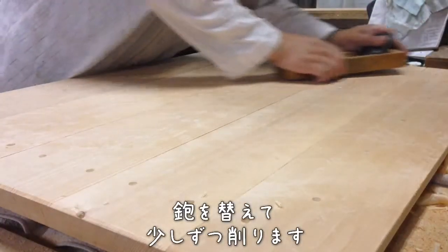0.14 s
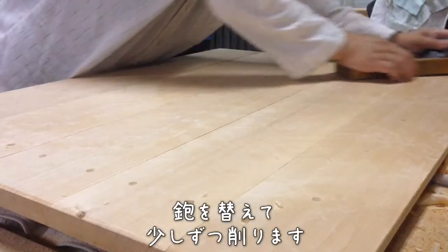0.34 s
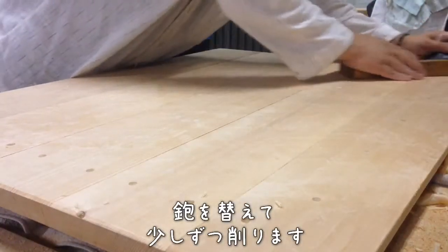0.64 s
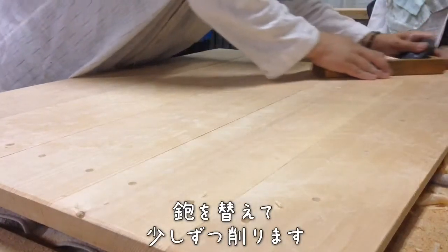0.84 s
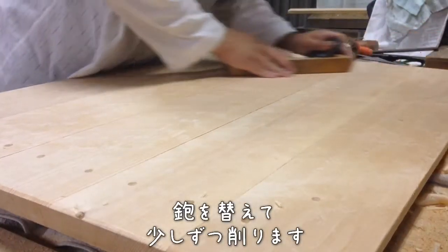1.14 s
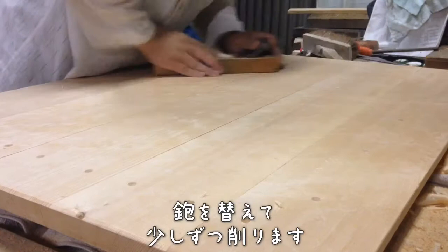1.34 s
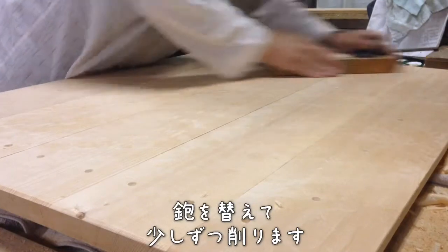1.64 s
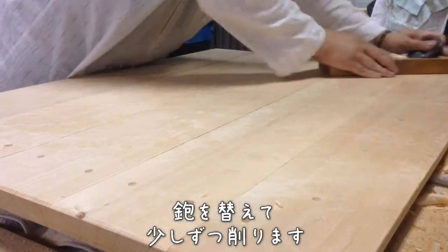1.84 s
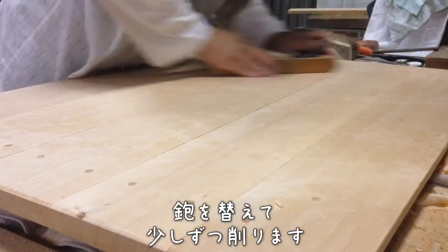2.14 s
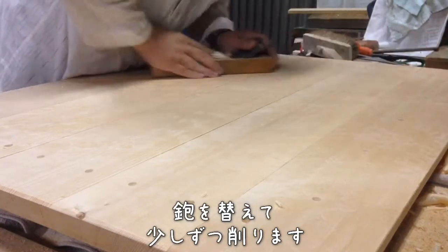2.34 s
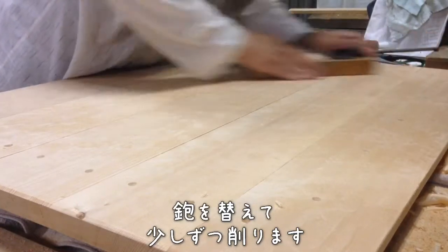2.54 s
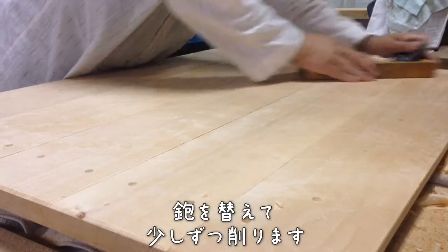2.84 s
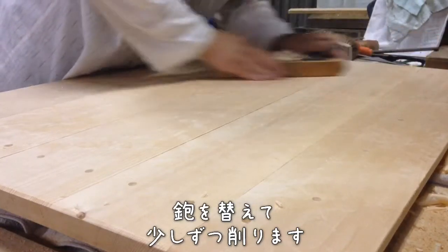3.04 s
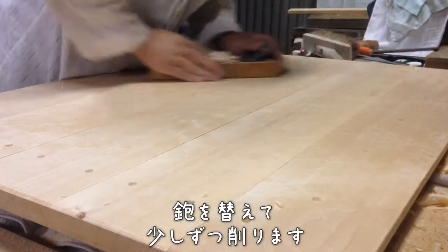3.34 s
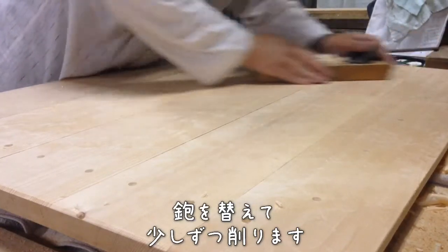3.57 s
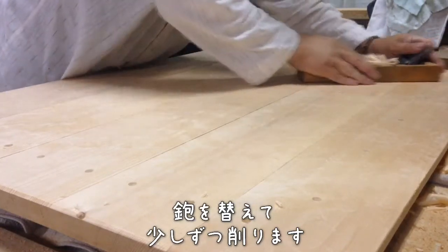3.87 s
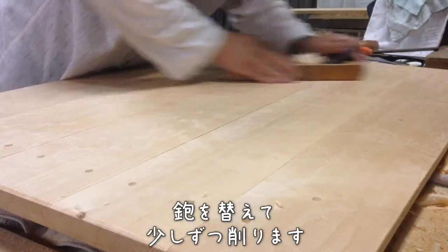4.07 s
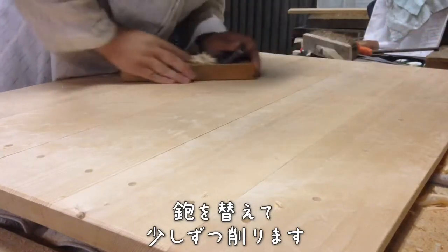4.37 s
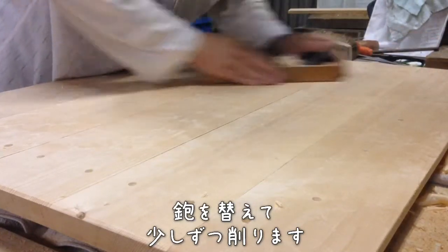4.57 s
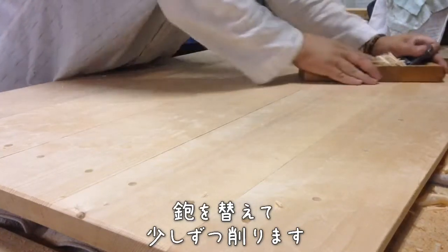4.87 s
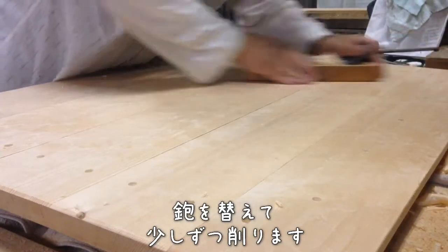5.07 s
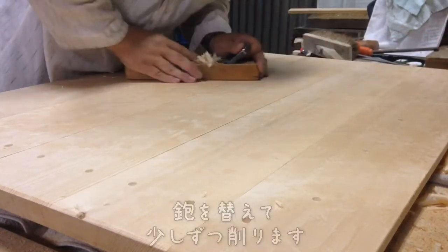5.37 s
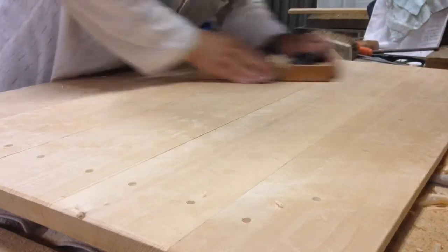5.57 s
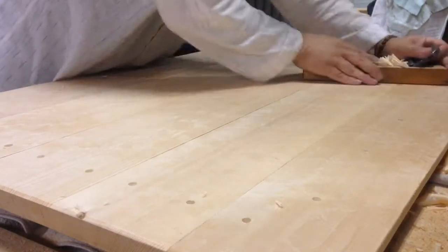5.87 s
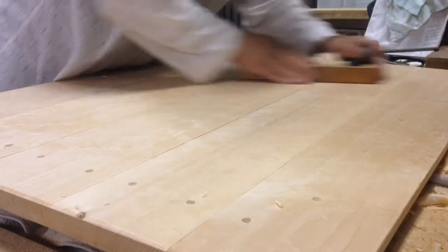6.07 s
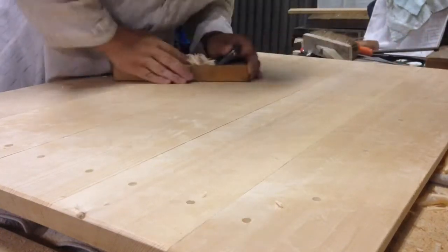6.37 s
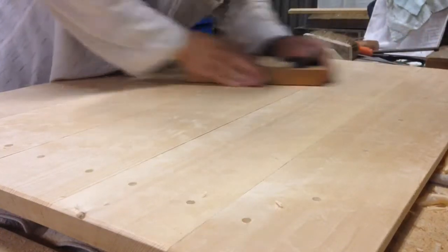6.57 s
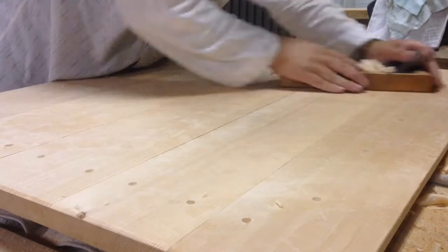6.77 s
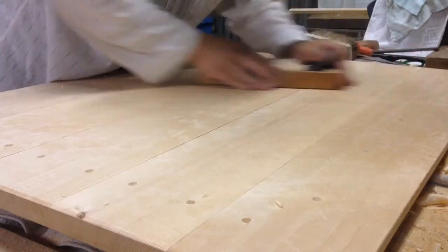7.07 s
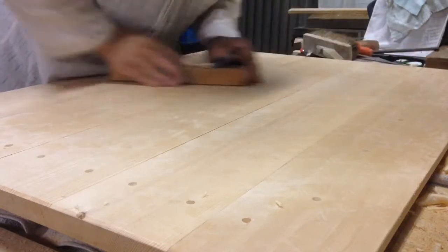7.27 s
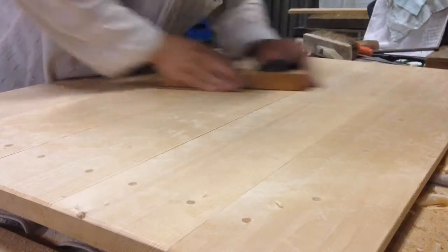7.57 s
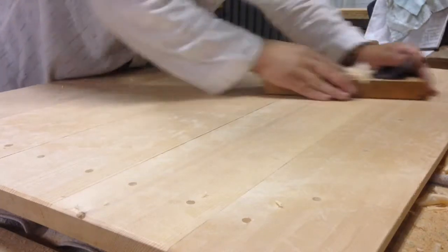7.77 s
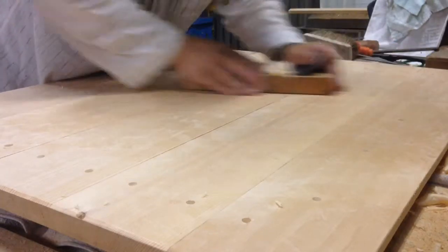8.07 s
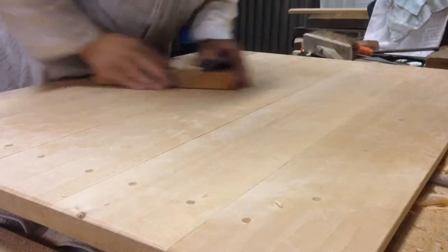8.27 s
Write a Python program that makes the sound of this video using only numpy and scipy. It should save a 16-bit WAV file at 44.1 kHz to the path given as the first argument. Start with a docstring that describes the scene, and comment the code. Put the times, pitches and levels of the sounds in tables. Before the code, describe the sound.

A wooden hand plane knocks onto a large tabletop, then rasps across it in eight steady hissing strokes with duller bumping returns.

```python
"""A wooden hand plane is set down on a large tabletop and pulled across it eight times in a small workshop.
On each pull random fractures of the fibres excite block and blade, and the shaving hisses.
On the way back the block bumps on the boards as struck modes; the unloaded blade scrapes and rings.
Snags splinter, stick-slip chatter groans and squeaks, and the tabletop drums under it all.
The direct sound is close and mono, with a short, fainter answer from the room over quiet air."""
import sys
import numpy as np
from scipy import signal
from scipy.fft import rfft, irfft, next_fast_len
from scipy.io import wavfile
from scipy.ndimage import uniform_filter1d, map_coordinates

SR = 44100
rng = np.random.default_rng(int(sys.argv[2]) if len(sys.argv) > 2 else 0)


def waveform_to_disk(signal):
    """Save audio, clipped to [-1, 1], as 16-bit WAV at the path in sys.argv[1]."""
    frames = np.transpose(np.atleast_2d(signal))
    scaled = np.clip(frames, -1, 1) * 32767
    samples = np.round(scaled).astype(np.int16)
    wavfile.write(sys.argv[1], SR, samples)


N = 371322

# All level columns are relative; the functions add the common offsets of each layer.
# modes of the tabletop: mode_hz [Hz], level_db [dB], t60_s [s]
TABLETOP_MODES = [(63.6, -39.5, 0.99), (109, -23, 0.25), (176.5, -5.5, 0.15), (207.2, -5.5, 0.21),
                  (233.3, 0, 0.19), (247, -5.5, 0.089), (316.5, 2, 0.093), (379, -6.5, 0.13),
                  (458, -7, 0.14), (500.6, 4, 0.098), (579, 0.5, 0.11), (679.5, -10, 0.17),
                  (728, -7, 0.077), (844, -3.5, 0.16), (1003, 5, 0.058), (1370, 6.5, 0.023),
                  (1856, 6.5, 0.064), (2016, -3, 0.085)]
# resonances of the steel blade: centre_hz [Hz], width_hz [Hz], level_db [dB]
BLADE_RESONANCES = [(1700, 39, 4.5), (3123, 41, -2), (3565, 59, 5), (4780, 71, 0.5), (5590, 120, -7),
                    (6450, 55, -12), (7800, 58, -13), (7980, 82, -4)]
# spectrum of the hissing shaving: freq_hz [Hz], level_db [dB per Hz]
SHAVING_SPECTRUM = [(800, -62), (2000, -14), (3500, 1.5), (5400, 0.5), (6800, -3), (8300, -6),
                    (10500, -8.5), (15000, -15)]


def amp(db):
    """Decibels to gain."""
    return 10 ** (np.asarray(db) / 20)


def unit(x):
    """Scale to rms 1."""
    return x / np.sqrt(np.mean(x ** 2) + 1e-20)


def along(points, hz):
    """(Hz, value) points read on a log frequency axis."""
    point_hz, values = np.transpose(points)
    return np.interp(np.log(hz + 1), np.log(point_hz), values)


def add(track, start_s, x):
    """Mix x into track at a time, cut off at the end of the track."""
    room = track[max(round(start_s * SR), 0):][:len(x)]
    room += x[:len(room)]


def wobble(rate):
    """A smooth random curve through rate knots a second."""
    knots = rng.standard_normal(int(N * rate / SR) + 4)
    return map_coordinates(knots, [np.arange(N) * rate / SR])


def filtered(x, response):
    """x times a response given as a function of frequency."""
    size = next_fast_len(N + SR // 2)
    hz = np.fft.rfftfreq(size, 1 / SR)
    return irfft(rfft(x, size) * response(hz), size)[:N]


def coloured(x, spectrum):
    """x shaped by a (Hz, dB) spectrum, at rms 1."""
    return unit(filtered(x, lambda hz: amp(along(spectrum, hz))))


def resonate(x, peaks):
    """x through parallel second-order resonances (Hz, width Hz, dB), at rms 1."""
    def response(hz):
        return sum(
            amp(db) * 1j * hz * width / (centre ** 2 - hz ** 2 + 1j * hz * width)
            for centre, width, db in peaks)
    return unit(filtered(x, response))


def fractures(rate, spread_db):
    """Tiny random impulses of uneven size, on average rate a second, at rms 1."""
    breaks = rng.random(N) < rate / SR
    size = rng.standard_normal(N) * amp(spread_db * rng.standard_normal(N))
    return unit(breaks * size)


def patchy(x, depth_db):
    """The colour drifts as the plane meets different grain: random gains over time and frequency."""
    z = signal.stft(x, nperseg=512)[2]
    field = uniform_filter1d(rng.standard_normal(z.shape), size=4, axis=0)  # smooth over frequency
    field = uniform_filter1d(field, size=6, axis=1)  # and over time
    return unit(signal.istft(z * amp(depth_db * unit(field)), nperseg=512)[1][:N])


def quiet_air():
    """The steady air of the workshop: coloured noise."""
    # freq_hz [Hz], level_db [dB per Hz]
    air_spectrum = [(25, -14), (60, 8), (150, 0), (250, 6), (340, 7.5), (450, 2), (560, 4.5), (1200, -1),
                    (3000, -5), (6000, -10), (15000, -12)]
    return amp(-57.5) * coloured(rng.standard_normal(N), air_spectrum)


def ring(modes, t, contact_s, scatter_db):
    """Struck modes decay as sines; a longer contact swells more slowly and leaves out the high ones."""
    hz, db, t60 = np.transpose(modes)[:, :, None]
    softening = np.exp(-(2.21 * hz * contact_s) ** 2)
    gain = amp(db + scatter_db * rng.standard_normal(hz.shape)) * softening
    sign = rng.choice([-1, 1], hz.shape)  # each mode starts up or down at random
    decay = np.exp(-np.log(1000) * t / t60)
    x = np.sum(sign * gain * np.sin(2 * np.pi * hz * t) * decay, axis=0)
    x = x * (1 - np.exp(-(t / (2.56 * contact_s)) ** 2))
    return x / np.sqrt(np.sum(gain ** 2)) / 2  # scaled by the summed power of the mode gains


def knocks():
    """Each bump rings the modes of tabletop and block, with a short dull thud of contact."""
    # bumps on the top: start_s [s], level_db [dB], contact_ms [ms], block_db [dB against the tabletop]
    bump_events = [(0.177, -19, 0.27, -26), (.185, -22, .25, -18), (0.469, -23.5, 0.68, -30),
                   (0.475, -19.5, 0.39, -9.5), (1.039, -31, 0.44, 1.5), (1.4449, -32, 0.79, -39),
                   (1.598, -29, 0.8, -31), (1.686, -24.5, 2.9, -38), (1.725, -23.5, 1.15, -37),
                   (2.128, -28, 2.2, -20), (2.184, -30, 0.88, -13), (2.534, -29.5, 1.4, -30),
                   (2.58, -27, 0.23, -19), (2.602, -26, 0.079, -26), (3.437, -28, 1.45, -7),
                   (3.592, -29, 0.85, -30), (4.5573, -25, 0.84, -1), (5.353, -32.5, 0.98, -32),
                   (5.574, -23.5, .9, -0.5), (5.647, -28, 2.2, -13), (6.403, -41, 1.3, -4),
                   (6.588, -25.5, 0.91, -6), (6.662, -22, 0.9, -4), (7.175, -31, 1.6, -1),
                   (7.584, -29.5, 2.3, -19)]
    # modes of the wooden block: mode_hz [Hz], level_db [dB], t60_s [s]
    block_modes = [(1025, -8, 0.044), (1162, -7, 0.052), (1198, 6, 0.034), (1274, -36, 0.048)]
    thud_spectrum = [(40, -77), (110, -13.5), (200, 3.0), (500, 2.5), (1300, -28.5), (2500, -34), (8000, -68)]
    out, t = np.zeros(N), np.arange(SR // 2) / SR
    thud_noise = coloured(rng.standard_normal(N), thud_spectrum)
    thud_envelope = amp(-12.0) * (np.exp(-t / 0.015) - np.exp(-t / 0.0011))
    for start_s, level_db, contact_ms, block_db in bump_events:
        top = ring(TABLETOP_MODES, t, contact_ms / 1000, scatter_db=1)
        block = ring(block_modes, t, contact_s=0.0008, scatter_db=1.5)
        thud = thud_envelope * thud_noise[round(start_s * SR):][:len(t)]
        add(out, start_s, amp(level_db + 9.5) * (top + amp(block_db) * block + thud))
    return out


def arch(length_s):
    """Speed of the hand over one movement: half a sine from rest to 1 and back to rest."""
    size = round(length_s * SR)
    return np.sin(np.pi * (np.arange(size) + 0.5) / size)


def stroke(length_s, hardest, law):
    """Gain over one stroke: it grows with the speed, while the hand leans in and eases off."""
    power, start_db, end_db = law
    speed = arch(length_s)
    share = np.linspace(0, 1, len(speed))
    pressure_db = np.interp(share, [0, np.clip(hardest, 0.05, 0.95), 1], [-start_db, 0, -end_db])
    return speed ** power * amp(pressure_db)


def handwork():
    """The hand's movements as controls: gains of rasp, hiss and rumble, and how far the edge bites."""
    # cutting pulls, and the unloaded plane sliding forward again: start_s [s], length_s [s],
    # hardest [share of the stroke], rasp_db [dB], hiss_db [dB], rumble_db [dB]
    pulls = [(0.7, 0.74, .6, -42, -47.5, -43), (1.881, 0.48, 0.58, -43, -47.5, -33.5),
             (2.813, 0.53, 0.37, -39, -44, -37.5), (3.857, 0.54, 0.48, -41.5, -45, -38),
             (4.934, 0.47, .42, -39.5, -44.5, -40), (5.936, 0.49, 0.4, -41, -44.5, -35),
             (6.907, 0.42, 0.72, -43.5, -47.5, -37.5), (7.926, 0.48, 0.6, -39.5, -44.5, -40.5)]
    returns = [(.18, 0.5, 0.14, -53, -59.5, -40), (1.47, 0.41, 0.45, -46.5, -53, -33),
               (2.39, 0.43, 0.65, -46, -51, -36), (3.35, 0.42, 0.12, -50.5, -58, -40),
               (4.45, 0.47, 0.75, -51.5, -56, -37), (5.46, .45, 0.31, -51.5, -62, -34.5),
               (6.44, 0.48, 0.33, -53, -58, -41), (7.455, 0.47, .55, -50.5, -56, -41.5)]
    # how the level follows a stroke: power of the speed, start_db [dB lighter], end_db [dB lighter]
    pull_law = (0.26, 6.5, 11.7)
    return_law = (0.15, 5.4, 5.4)
    # the rumble swells where the sole crosses the most uneven boards: hardest [share of the stroke], law
    pull_rumble = (0.8, (0.39, 9.4, 6.1))
    return_rumble = (0.45, (0.25, 11.2, 10.3))
    # the blade digs in for a moment, mostly around the turn into a pull:
    # start_s [s], length_s [s], rasp_db [dB], hiss_db [dB]
    drags = [(0.695, 0.18, -55.5, -56.5), (1.11, 0.14, -47.5, -59), (2.93, 0.073, -56, -75),
             (3.729, 0.12, -49, -64), (3.936, 0.17, -46, -72), (4.77, 0.1, -44.5, -56),
             (5.684, 0.088, -50, -50.5), (5.761, 0.15, -45.5, -53), (5.972, 0.11, -48, -52),
             (6.09, 0.075, -48.5, -66), (6.674, 0.068, -59, -78), (6.775, 0.089, -46, -59),
             (6.92, .13, -54, -56.5), (7.942, 0.068, -49, -59)]

    rasp, hiss, rumble, cutting = np.zeros((4, N))
    movements = [(pulls, pull_law, pull_rumble), (returns, return_law, return_rumble)]
    for rows, law, boards in movements:
        for start_s, length_s, hardest, rasp_db, hiss_db, rumble_db in rows:
            effort = stroke(length_s, hardest, law)
            add(rasp, start_s, amp(rasp_db) * effort)
            add(hiss, start_s, amp(hiss_db) * effort)
            add(rumble, start_s, amp(rumble_db) * stroke(length_s, *boards))
    for start_s, length_s, *_ in pulls:
        add(cutting, start_s, np.minimum(1, 3.9 * arch(length_s)))  # bites once the plane is under way
    for start_s, length_s, rasp_db, hiss_db in drags:
        swell = arch(length_s) ** 0.9  # a higher power makes a more pointed swell
        add(rasp, start_s, amp(rasp_db) * swell)
        add(hiss, start_s, amp(hiss_db) * swell)
    return rasp, hiss, rumble, cutting


def planing(rasp_gain, hiss_gain, bite):
    """Tearing fibres excite the block and the blade; a firm cut rips more brightly."""
    # tearing fibres: freq_hz [Hz], level_db [dB per Hz]
    tearing_spectrum = [(100, -50), (280, -4.5), (500, 6), (700, -0.5), (1300, -3.5), (2300, -3),
                        (3200, -12), (5000, -18.5), (10000, -61)]
    # a thick shaving ripping free: freq_hz [Hz], level_db [dB per Hz]
    ripping_spectrum = [(500, -38), (1000, 2), (1300, 4.5), (2000, -2.5), (3000, 0), (4500, -10),
                        (8000, -42)]
    # the sliding block: centre_hz [Hz], width_hz [Hz], level_db [dB]
    block_resonances = [(564, 26, 8.5), (810, 49, 7), (1001.4, 25.6, 11.5), (1147, 11, 5), (1840, 167, 0.5),
                        (1990, 520, -14)]
    rip_db, rip_growth = 2, 1  # rip level in a firm cut, and how much faster than the rasp it grows

    # hard and soft grain passes under the edge
    judder_db = 0.5 * wobble(14) + 1.25 * wobble(40) + 1.05 * wobble(220)
    tearing = coloured(patchy(fractures(rate=7000, spread_db=0.5), depth_db=4.0), tearing_spectrum)
    block = resonate(patchy(fractures(rate=5000, spread_db=2.0), depth_db=5.0), block_resonances)
    shaving = coloured(patchy(fractures(rate=16000, spread_db=2.0), depth_db=2.0), SHAVING_SPECTRUM)
    steel = resonate(patchy(fractures(rate=11000, spread_db=1.5), depth_db=6.0), BLADE_RESONANCES)
    ripping = coloured(patchy(fractures(rate=9000, spread_db=1.5), depth_db=8.0), ripping_spectrum)

    flare = (hiss_gain / amp(-52.5)) ** 0.63  # the blade's ring grows faster than the hiss
    rip = bite * amp(rip_db) * (rasp_gain / amp(-40)) ** rip_growth
    # in the cut the shaving hisses and the wood damps the tool; sliding back, block and blade ring more freely
    rasp = amp(2.0 + 1.0 * bite) * tearing + amp(0.7 - 2.0 * bite) * block + rip * ripping
    hiss = amp(0.53 * bite) * shaving + amp(-0.5 - 1.5 * bite) * flare * steel
    return amp(judder_db - 2.0) * (rasp_gain * rasp + hiss_gain * hiss)


def drumming(gain):
    """The sole rides over the uneven boards and sets the tabletop rumbling in lumps."""
    # freq_hz [Hz], level_db [dB per Hz]
    rumble_spectrum = [(25, -24), (55, -7), (90, -3), (170, 2), (240, 2.5), (330, 1), (550, -8), (800, -17),
                       (2000, -30)]
    lumps_db = 3.06 * wobble(24)
    # the low modes, widened by the weight of the plane
    boards = [(hz, 2.95 / t60, db) for hz, db, t60 in TABLETOP_MODES if hz < 700]
    rumble = coloured(resonate(fractures(rate=500, spread_db=2.5), boards), rumble_spectrum)
    thumps = coloured(fractures(rate=900, spread_db=4.0), rumble_spectrum)
    return gain * amp(lumps_db) * (amp(-4) * rumble + amp(-12.0) * thumps)


def snags():
    """Short bursts of splintering sound in wood, blade and shaving; longer ones build more slowly."""
    # the edge snags on the grain: start_s [s], level_db [dB], length_s [s, time scale of rise and fall]
    snag_events = [(0.182, -50, .006), (0.751, -42.5, 0.033), (1.033, -40, 0.013), (1.647, -45, 0.032),
                   (1.952, -43.5, 0.029), (2.055, -37, 0.016), (2.128, -40, 0.054), (2.571, -41.5, 0.054),
                   (2.661, -40, 0.014), (2.7905, -32.5, 0.0054), (3.054, -37.5, 0.03), (3.743, -47, 0.023),
                   (4.113, -40, 0.018), (4.301, -45.5, 0.019), (5.326, -47, 0.014), (5.807, -41, 0.031),
                   (6.232, -38.5, 0.02), (6.328, -45, 0.012), (6.611, -45.5, 0.0083), (6.675, -43.5, 0.018),
                   (7.117, -35, 0.028), (7.19, -49, 0.013), (7.301, -44, 0.056)]
    splinter_spectrum = [(200, 1.5), (700, 9), (2200, 1), (4300, -7.5), (7000, -47), (15000, -73)]
    force, t = np.zeros(N), np.arange(SR // 4) / SR
    for start_s, level_db, length_s in snag_events:
        burst = (1 - np.exp(-5 * t / length_s)) * np.exp(-(t / length_s) ** 2)
        add(force, start_s, amp(level_db) * burst)
    splinters = coloured(fractures(rate=14000, spread_db=6.0), splinter_spectrum)
    steel = resonate(fractures(rate=10000, spread_db=1.0), BLADE_RESONANCES)
    shaving = coloured(fractures(rate=16000, spread_db=3.0), SHAVING_SPECTRUM)
    return force * (amp(5.0) * splinters + amp(-2.5) * steel + amp(-6) * shaving)


def chatter():
    """The plane sticks and slips at a resonance, a wavering sine: the top groans, block and blade squeak."""
    # start_s [s], level_db [dB], length_s [s], pitch_hz [Hz, before the waver]
    chatter_events = [(0.201, -35.5, 0.16, 571), (0.271, -30.5, 0.165, 244.2), (0.484, -24, 0.05, 222),
                      (0.761, -25.5, 0.046, 236), (0.785, -53, .18, 4690), (1.68, -24, 0.077, 216),
                      (2.681, -26, 0.03, 236), (4.065, -27.5, 0.036, 1185), (4.641, -24.5, 0.026, 239),
                      (4.801, -35, 0.032, 1857), (5.03, -39, 0.14, 1174), (5.1, -26.5, 0.019, 1190),
                      (5.351, -31.5, 0.049, 236.4), (5.579, -21, 0.049, 236), (5.83, -38, 0.063, 785),
                      (6.11, -32, 0.04, 1204), (6.798, -41, 0.023, 3590), (6.91, -50, 0.053, 4700),
                      (7.18, -30.5, 0.04, 861.6), (7.187, -32.5, 0.015, 3600), (7.465, -48, 0.1, 1050),
                      (8.156, -36, 0.1, 1030)]
    out = np.zeros(N)
    for start_s, level_db, length_s, pitch_hz in chatter_events:
        t = np.arange(round(length_s * SR)) / SR
        # pitch and strength of the slips change every few cycles
        pitch_knots, strength_knots = rng.standard_normal((2, 100))
        position = [t * pitch_hz / 4]
        waver = map_coordinates(pitch_knots, position, mode="reflect")
        rough = map_coordinates(strength_knots, position, mode="reflect")
        phase = 2 * np.pi * np.cumsum(pitch_hz * (1 + 0.016 * waver)) / SR
        swell = np.sqrt(np.sin(np.pi * t / length_s))
        add(out, start_s, amp(level_db - 3.0 + 4.4 * rough) * swell * np.sin(phase))
    return out


def workshop(x):
    """The room's short answer: a decaying noise tail whose decay time depends on frequency."""
    # freq_hz [Hz], t60_s [s]
    room_decay = [(100, 0.53), (1000, 0.3), (4000, 0.035), (14000, 0.2)]
    hz, t, z = signal.stft(rng.standard_normal(SR // 2), SR, nperseg=256)
    decay_db = -60 * t / along(room_decay, hz)[:, None]
    tail = signal.istft(z * amp(decay_db), SR, nperseg=256)[1]
    delayed = np.pad(tail, (300, 0))  # samples before the room answers
    return signal.fftconvolve(x, delayed / np.linalg.norm(tail))[:N]


def scene():
    """The plane at work, the room and its quiet air."""
    rasp, hiss, rumble, cutting = handwork()
    work = knocks() + planing(rasp, hiss, cutting) + drumming(rumble) + snags() + chatter()
    return (work + amp(-11.0) * workshop(work) + quiet_air())[None]


def record(dry):
    """The microphone signal keeps nothing above the band limit."""
    band_limit_hz = 15400
    return np.array([filtered(channel, lambda hz: hz < band_limit_hz) for channel in dry])


dry = scene()
out = record(dry)
waveform_to_disk(out)
```